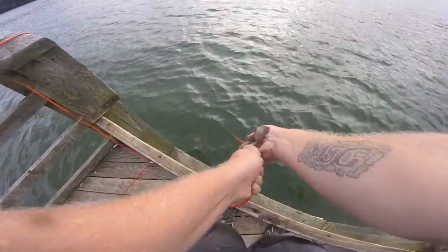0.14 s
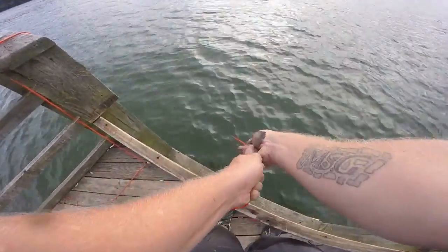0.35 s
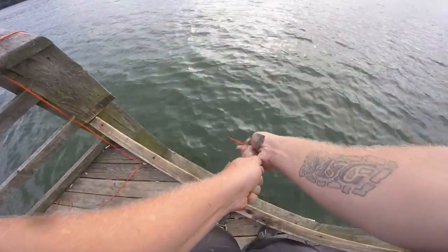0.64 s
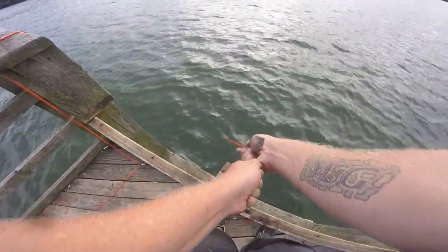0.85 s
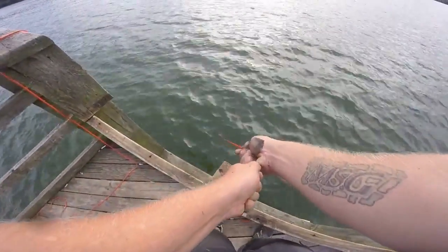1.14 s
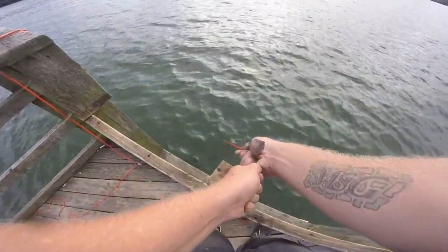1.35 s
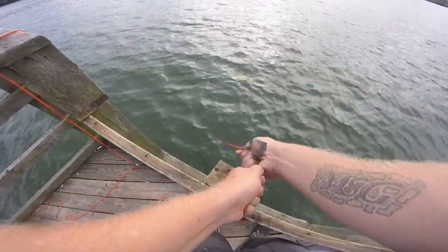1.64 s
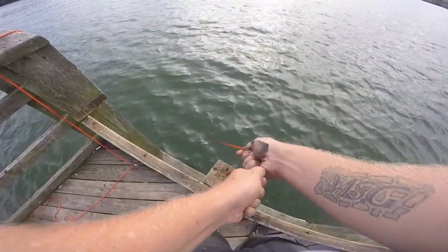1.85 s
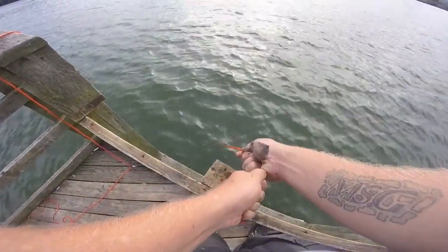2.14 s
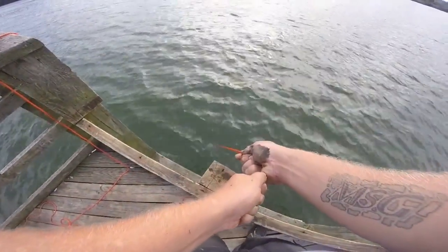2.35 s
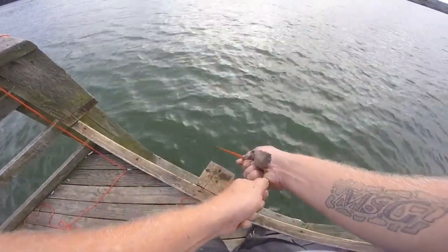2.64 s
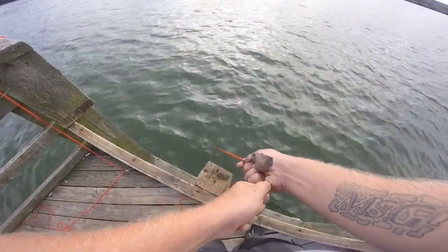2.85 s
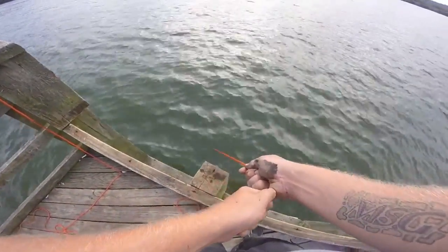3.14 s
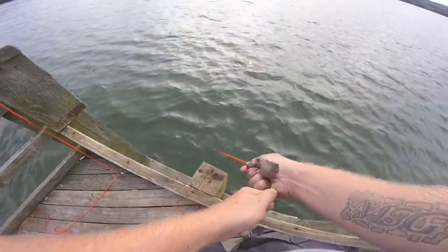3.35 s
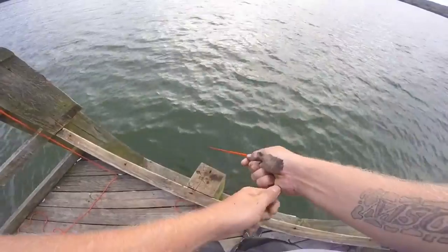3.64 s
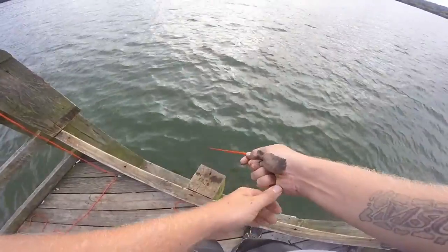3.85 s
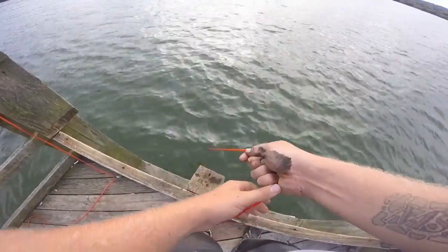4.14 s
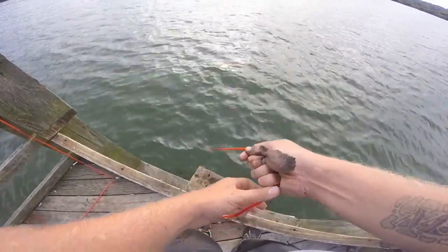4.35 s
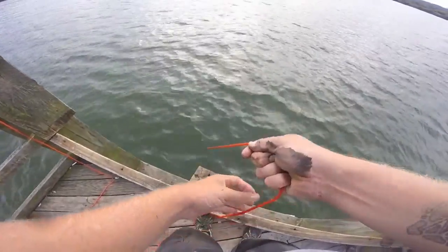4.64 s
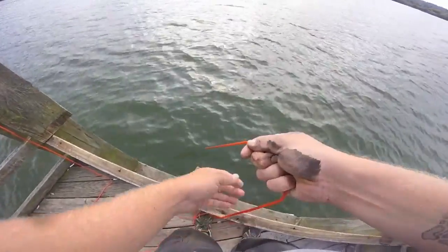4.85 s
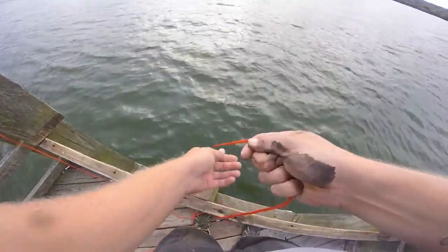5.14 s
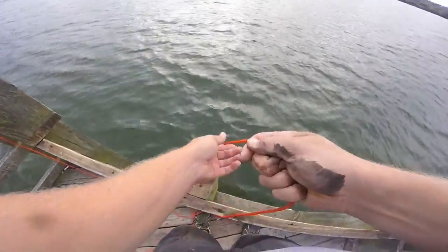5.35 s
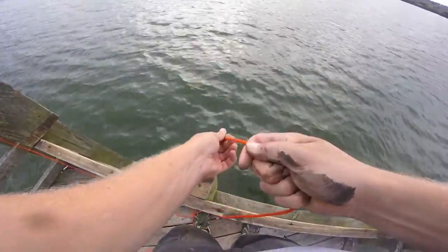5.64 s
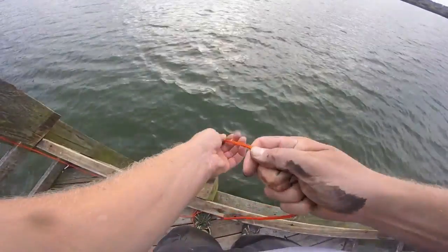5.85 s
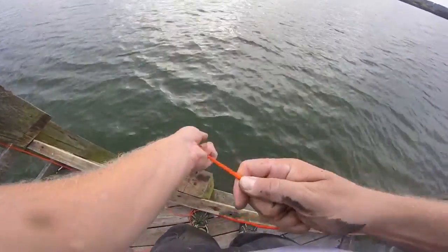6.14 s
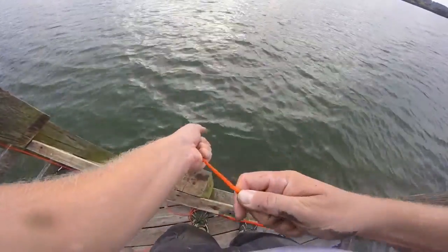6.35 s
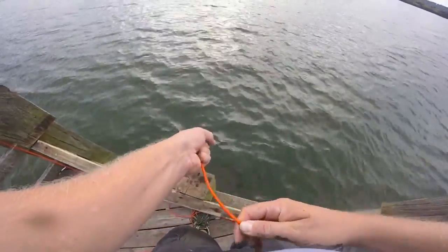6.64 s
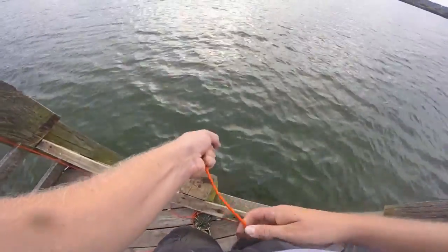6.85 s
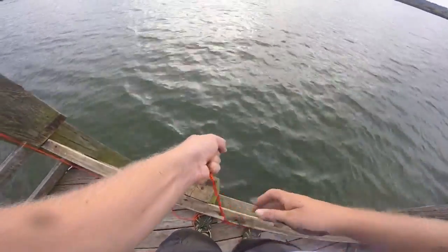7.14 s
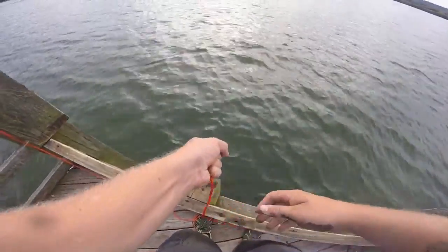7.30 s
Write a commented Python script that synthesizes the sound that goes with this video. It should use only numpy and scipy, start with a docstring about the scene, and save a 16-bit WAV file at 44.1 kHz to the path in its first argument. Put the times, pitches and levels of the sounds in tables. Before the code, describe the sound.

Outdoors on the water, a microphone aboard picks up a motor's continuous low drone and a boomy hull tone. After about a second and a half the hum breaks into distinct rapid chugs, barking most around the middle, then dropping in pitch and softening with small surges. Rumbling gusts come and go, with slight machinery whirr, thin water hiss and barely audible swishes of cord.

```python
"""Small engine boat, line over the side

A wooden boat idles along on a lake while a line is paid out by hand over its side.
The engine fires about 30 times a second, eases off, then hunts around its idle. Each exhaust pulse is a stack
of sine orders with a puff of gas noise; one order booms in the hull, and the machinery whirrs as filtered noise.
Shaped noise also makes the gusts buffeting the microphone, the water hissing past
and the line sliding twice through the fingers."""
import sys
import numpy as np
from scipy.fft import rfft, irfft, next_fast_len
from scipy.io import wavfile
from scipy.ndimage import map_coordinates

SR = 44100
rng = np.random.default_rng(int(sys.argv[2]) if len(sys.argv) > 2 else 0)


def materialize(psi):
    """Save the field psi as 16-bit PCM at rate SR to the path in sys.argv[1].

    A 1-D psi becomes a single channel; in a 2-D psi each row is a channel.
    """
    bounded = np.clip(np.atleast_2d(psi).T, -1, 1)
    quanta = np.round(bounded * 32767).astype(np.int16)
    wavfile.write(sys.argv[1], SR, quanta)


N = 329559
TIME = np.arange(N) / SR  # seconds

# engine speed: time_s, firing_rate_hz
ENGINE_SPEED = [(0.0, 32.49), (0.97, 31.66), (1.63, 31.79), (2.17, 30.67), (3.0, 30.28), (3.38, 29.74),
                (4.72, 28.42), (5.39, 27.22), (5.95, 28.81), (6.45, 27.23), (6.97, 28.68), (7.2, 27.88),
                (7.45, 28.41)]
CRUISE_HZ = 30  # firing rate at which the bark and rush levels below apply
START_CYCLE = .606  # the cycle count starts this far below zero

# how hard the engine works: time_s, effort_db
ENGINE_EFFORT = [(0, -13), (1, -0.5), (1.6, -4), (2.05, 3), (2.75, 0.5), (3.2, 6.5), (4.5, 4), (5.4, -0.9),
                 (6.45, -6), (7.05, 1), (7.47, -3.5)]
# bark of the exhaust: level at cruise and zero effort, rise for one more firing a second
BARK_DB, BARK_DB_PER_HZ = -30, 1.5
# rush of gas: the same, but following only a share of the effort
RUSH_DB, RUSH_DB_PER_HZ, RUSH_EFFORT_SHARE = -33, 1.59, 0.11
# puff of gas at each firing: extra strength (gain), then delay and decay (cycles)
PUFF_GAIN, PUFF_DELAY, PUFF_DECAY = 0.48, .03, 0.06

# low thump of the exhaust: time_s, level_db
THUMP_LEVEL = [(0, -32.5), (.9, -28.5), (1.55, -25), (2.1, -23), (2.7, -26.5), (4.1, -26.5), (5.85, -32),
               (6.05, -28.3), (6.9, -31.5), (7.47, -30.5)]
# whirr of the machinery: time_s, level_db
WHIRR_LEVEL_CURVE = [(0, -49.5), (1.6, -51), (3, -55), (5.5, -55), (7.47, -57)]

# one order (multiple of the firing rate) booms in the hull; from FIRST_BARK_ORDER up they form the bark
BOOM_ORDER, FIRST_BARK_ORDER = 8, 12
BOOM_DB = -26.5  # before the hull's gain
# hull resonance and the dead spot just below it: centre_hz, half_width_hz, gain_db
HULL_MODES = [(251, 8.3, 11.4), (243, 1.02, -8.5)]

# the smooth hum turns into a hard chug: the pulses sharpen quickly, their colour changes more slowly
CHUG_START_S, CHUG_RISE_S, CHUG_COLOUR_S = 1.45, 0.428, 1.09
# exhaust colour: order (multiple of the firing rate), hum_db, chug_db
EXHAUST_ORDERS = [(4.0, -4, -5.5), (5.0, -11.5, -3.5), (6.0, -4, -16), (7.0, -20, -17), (8.0, -8, -6.5),
                  (9.0, -8, -15.5), (10.0, -11, -9), (11.0, -9.0, -7.5), (12.0, -12, -17),
                  (13.0, -9.5, -5.0), (14.0, -11, -10), (15.0, -16, -16.5), (16.0, -5.5, -19.5),
                  (17.0, -13, -19), (18.0, -16, -7), (19.0, -5, -7), (20.0, -20, -13.5),
                  (21.0, -16.5, -12.5), (22.0, -14.5, -18.5), (23.0, -28, -15), (24.0, -33.5, -22.5)]

# gusts on the microphone: start_s, end_s, level_db
GUST_EVENTS = [(0, .27, -26), (.2, .55, -34.5), (.45, 1.45, -35.5), (1.3, 1.7, -29), (2.15, 2.8, -38),
               (3.05, 3.55, -35), (3.6, 4.9, -30), (4.85, 5.3, -34), (5.25, 6.7, -39.5), (6.9, 7.14, -35)]
GUST_RAMP_S, BREEZE_DB = 0.092, -40.5

# water along the hull: time_s, level_db
WATER_LEVEL = [(0, -61), (.6, -63.5), (1.8, -58.5), (2.7, -59.5), (3.2, -64), (4.2, -67), (5.5, -74.5),
               (7.47, -74.5)]

# line sliding through the hand: start_s, end_s, level_db
LINE_SLIDES = [(-.05, .38, -56), (6.45, 6.99, -61.5)]
SLIDE_RAMP_S = .16

FLOOR_DB = -64.5  # faint steady hiss behind everything

# colour of the exhaust gas: frequency_hz, relative_db
GAS_COLOUR = [(10, -60.5), (110, -1.5), (160, 3), (260, -1.5), (340, 0), (450, -0.5), (560, 0), (680, -5.5),
              (760, -12.5), (900, -20), (1200, -37.5), (3000, -120)]
# colour of the wind buffeting: frequency_hz, relative_db
WIND_COLOUR = [(8, -20), (24, 3.5), (45, 1), (80, 2), (120, -8.5), (200, -12.5), (500, -53), (2000, -120)]
# colour of the machinery whirr: frequency_hz, relative_db
WHIRR_COLOUR = [(500, -7.5), (800, 4), (1000, 0.5), (1250, -4), (1550, -7.5), (1870, -2), (2100, -6.5),
                (2350, -17.5), (3200, -25.5), (7000, -85)]
# colour of the water hiss: frequency_hz, relative_db
WATER_COLOUR = [(1350, -34.5), (2300, -6), (2980, -2.5), (3540, 6), (4240, 3), (4880, -10.5), (5360, -10.5),
                (5840, -1.5), (6780, -1.5), (7930, -20), (9280, -17.5), (10400, -28), (13400, -32.5),
                (14400, -24.5), (15000, -44)]
# colour of the sliding line: frequency_hz, relative_db
LINE_COLOUR = [(1400, -18.5), (2100, 13), (2600, -9), (4000, -6), (5800, -1.5), (6800, -10.5), (8500, -21),
               (14000, -34.5)]
# colour of the background hiss: frequency_hz, relative_db
FLOOR_COLOUR = [(1000, 3), (3000, 4), (6500, -3.5), (8000, -8), (12000, -14.5), (14000, -18),
                (15000, -30.5)]
TOP_HZ = 15100  # nothing sounds from here up


def amp(db):
    """Decibels to gain."""
    return 10 ** (np.asarray(db) / 20)


def unit(x):
    """Scale to rms 1."""
    return x / np.sqrt(np.mean(x ** 2) + 1e-20)


def curve(rows):
    """Straight-line automation through (time, value) points, one value per sample."""
    return np.interp(TIME, *np.transpose(rows))


def swells(rows, ramp_s):
    """Gain of events that rise, hold and fall; where they overlap their powers add."""
    power = np.zeros(N)
    for start_s, end_s, level_db in rows:
        shape = np.clip(np.minimum(TIME - start_s, end_s - TIME) / ramp_s, 0, 1)
        power += (amp(level_db) * shape) ** 2
    return np.sqrt(power)


def wobble(rate_hz):
    """A smooth random curve through normal draws, rate_hz of them a second."""
    knots = rng.standard_normal(int(N * rate_hz / SR) + 4)
    return map_coordinates(knots, [TIME * rate_hz])


def filtered(x, response):
    """Filter x by a response of frequency, padded so that its tail does not wrap round."""
    size = next_fast_len(N + SR // 2)
    spectrum = rfft(x, size) * response(np.fft.rfftfreq(size, 1 / SR))
    return irfft(spectrum, size)[:N]


def noise(colour, gate=1):
    """White noise, gated, then coloured along a log-frequency curve and set to rms 1."""
    hz, db = np.transpose(colour)
    gated = gate * rng.standard_normal(N)
    return unit(filtered(gated, lambda f: amp(np.interp(np.log(f + 1), np.log(hz), db))))


def firings(cycle, scatter_db):
    """No two firings burn equally hard: a random gain for each, gliding to the next."""
    strokes = np.arange(np.floor(cycle[0]), cycle[-1] + 1)
    return amp(np.interp(cycle, strokes, scatter_db * rng.standard_normal(len(strokes))))


def pipe(orders, level_db, size=128):
    """Minimum phase of each order, for a pulse that strikes at once and then rings out in the pipe."""
    k = np.arange(size // 2 + 1)
    # levels fall away below the lowest order and above the highest
    skirts_db = 6 * np.maximum(orders[0] - k, 0) + 2 * np.clip(k - orders[-1], 0, 12)
    cepstrum = irfft(np.log(amp(np.interp(k, orders, level_db) - skirts_db)))
    # keeping only the doubled first half puts the energy as early as possible
    return rfft(2 * cepstrum[:size // 2], size).imag[orders.astype(int)]


def hull(tone_hz):
    """Gain in dB of the hull for a tone: a flat-topped peak and a narrow dip."""
    return sum(db / (1 + ((tone_hz - hz) / half_width) ** 6) for hz, half_width, db in HULL_MODES)


def engine():
    """One exhaust pulse a cycle, built from its orders, with a puff of gas and the machinery's whirr."""
    speed, effort_db, thump_db = curve(ENGINE_SPEED), curve(ENGINE_EFFORT), curve(THUMP_LEVEL)
    above_cruise = speed - CRUISE_HZ
    bark_db = BARK_DB + BARK_DB_PER_HZ * above_cruise + effort_db
    boom_db = BOOM_DB + hull(BOOM_ORDER * speed)
    chug = np.clip((TIME - CHUG_START_S) / CHUG_RISE_S, 0, 1)
    colour = np.clip((TIME - CHUG_START_S) / CHUG_COLOUR_S, 0, 1)
    cycle = np.cumsum(speed) / SR - START_CYCLE

    orders, hum_db, chug_db = np.transpose(EXHAUST_ORDERS)
    exhaust = np.zeros(N)
    for k, smooth_db, hard_db, phase in zip(orders, hum_db, chug_db, pipe(orders, chug_db)):
        # one order booms in the hull; the others form a low thump and a sharp bark
        if k == BOOM_ORDER:
            level_db = boom_db
        elif k < FIRST_BARK_ORDER:
            level_db = thump_db
        else:
            level_db = bark_db
        # high orders trail behind while the engine hums, so its pulses run together
        trail = np.pi * (1 - chug) * k * k / orders[-1]
        colour_db = smooth_db + colour * (hard_db - smooth_db) + .6 * wobble(2.43)
        exhaust += amp(level_db + colour_db) * np.sin(2 * np.pi * k * cycle + phase - trail)
    exhaust *= firings(cycle, scatter_db=0.57)

    # turbulent gas is strongest just after the valve opens
    puff = 1 + PUFF_GAIN * chug * np.exp(-((cycle - PUFF_DELAY) % 1) / PUFF_DECAY)
    gas_db = RUSH_DB + RUSH_DB_PER_HZ * above_cruise + RUSH_EFFORT_SHARE * effort_db
    gas = amp(gas_db) * noise(GAS_COLOUR, puff)
    whirr = amp(curve(WHIRR_LEVEL_CURVE) + 0.51 * wobble(8)) * noise(WHIRR_COLOUR)
    return exhaust + gas + whirr


def wind():
    """Gusts over a light breeze buffet the microphone: low noise made lumpy by a random level."""
    strength = np.hypot(amp(BREEZE_DB), swells(GUST_EVENTS, GUST_RAMP_S))
    buffeting = unit(amp(2.3 * wobble(6.7)) * noise(WIND_COLOUR))
    return strength * buffeting


def water():
    """Water along the hull: bright noise that swells early, then dies away as the boat slows."""
    return amp(curve(WATER_LEVEL) + .4 * wobble(4.7)) * noise(WATER_COLOUR)


def line():
    """The cord slips through the fingers: a soft swish of noise, swelling, fluttering and fading."""
    return swells(LINE_SLIDES, SLIDE_RAMP_S) * amp(.8 * wobble(30)) * noise(LINE_COLOUR)


def scene():
    """Everything at one microphone in the boat, over a faint steady hiss."""
    background = amp(FLOOR_DB) * noise(FLOOR_COLOUR)
    return (engine() + wind() + water() + line() + background)[None]


def record(dry):
    """A 3 ms fade at both ends, then a sharp cut of everything from the band limit up."""
    fade = np.clip(np.minimum(TIME, TIME[-1] - TIME) / .003, 0, 1)
    return filtered(dry[0] * fade, lambda f: f < TOP_HZ)[None]


dry = scene()
out = record(dry)
materialize(out)
```